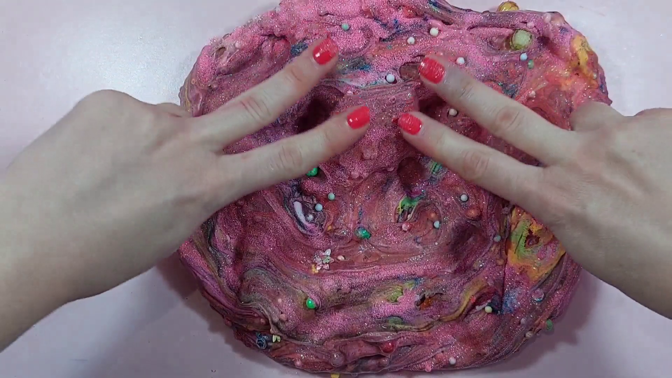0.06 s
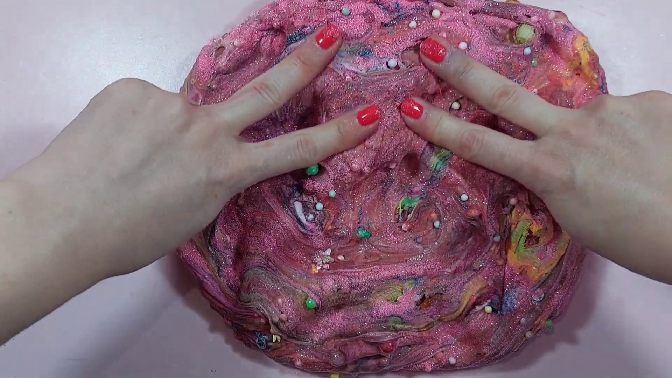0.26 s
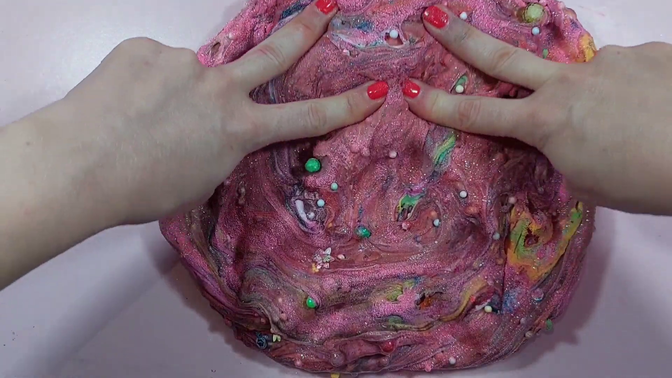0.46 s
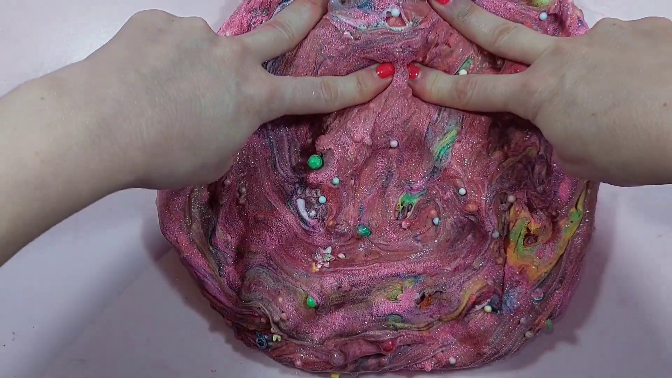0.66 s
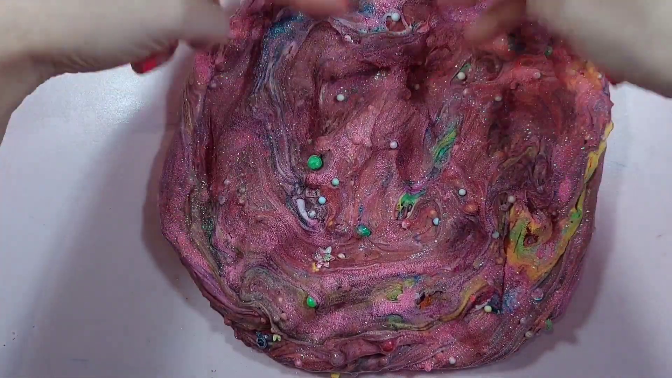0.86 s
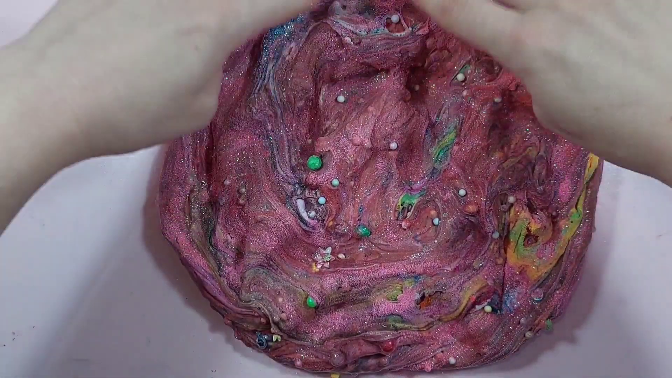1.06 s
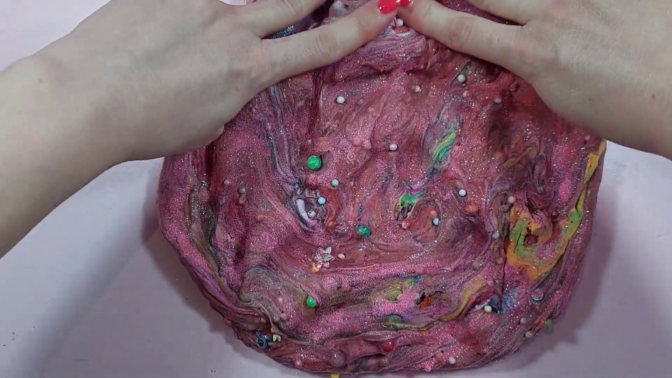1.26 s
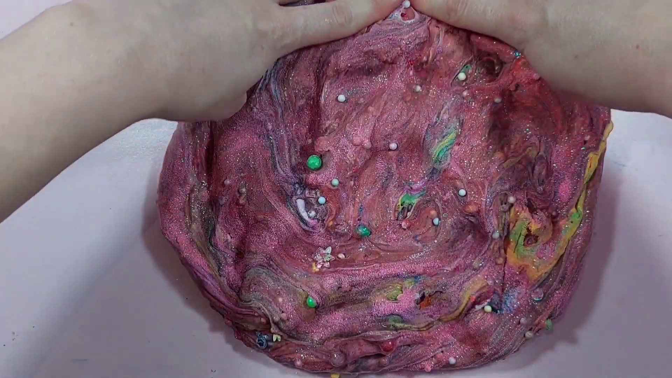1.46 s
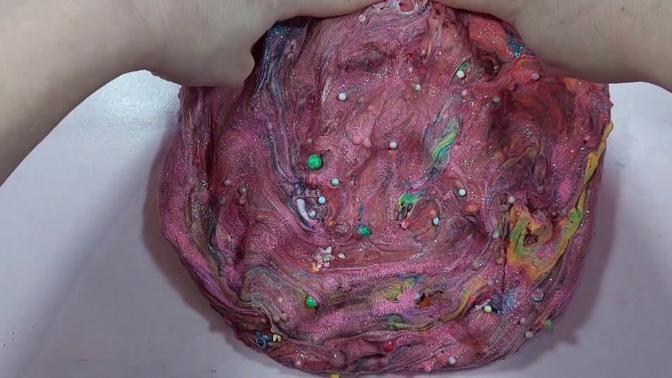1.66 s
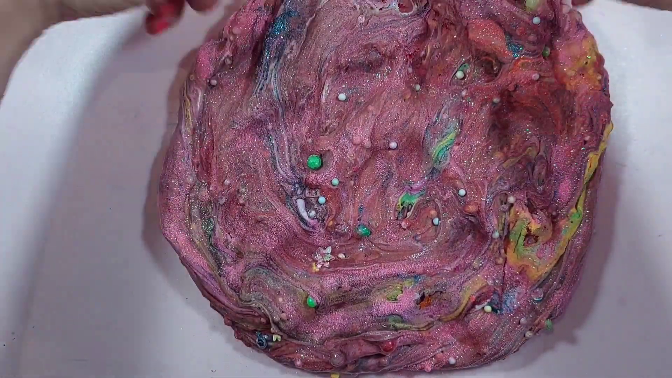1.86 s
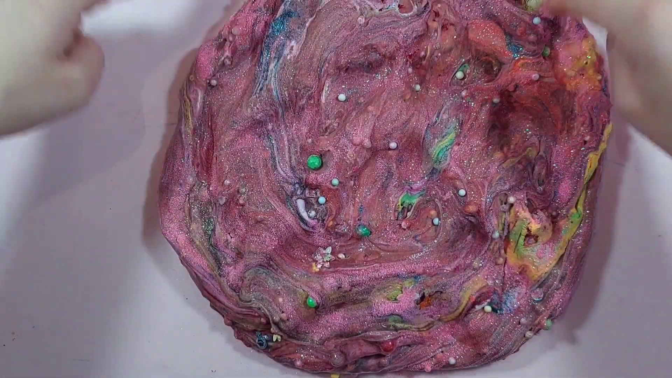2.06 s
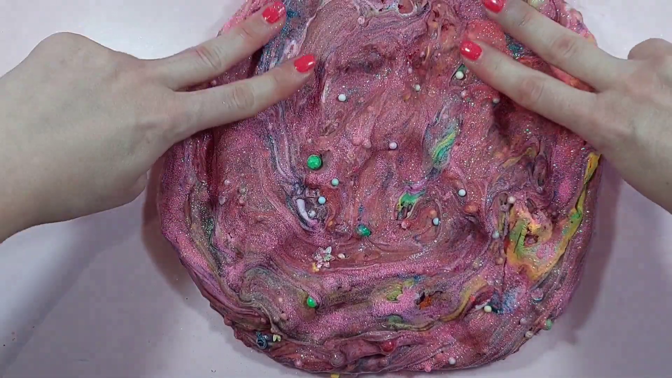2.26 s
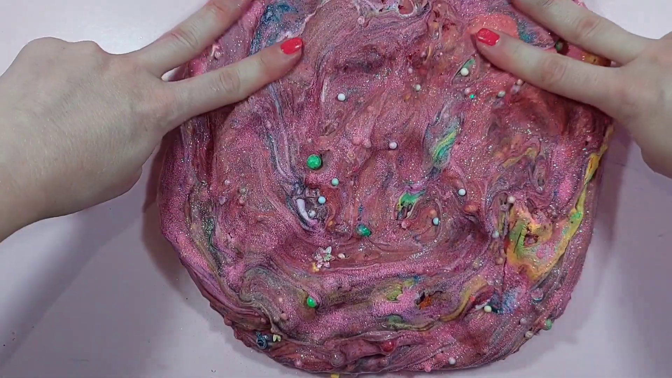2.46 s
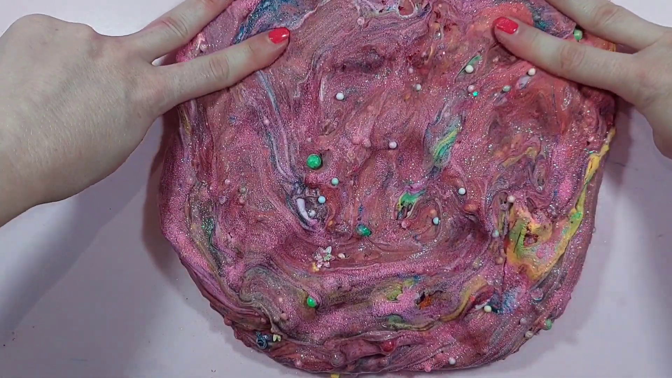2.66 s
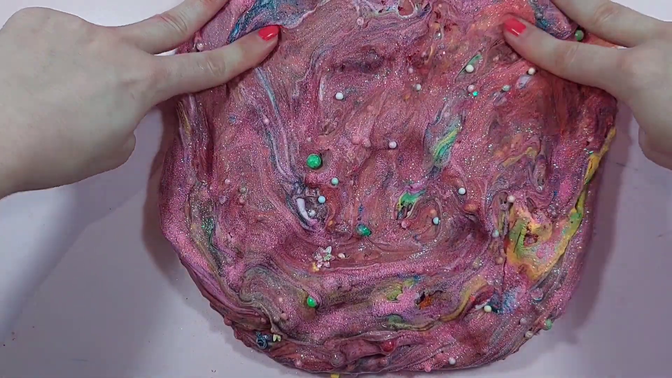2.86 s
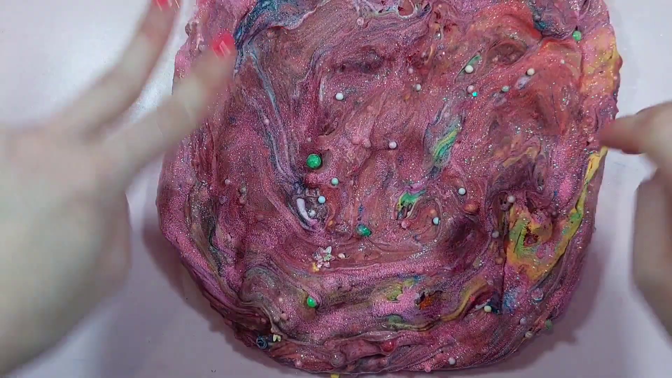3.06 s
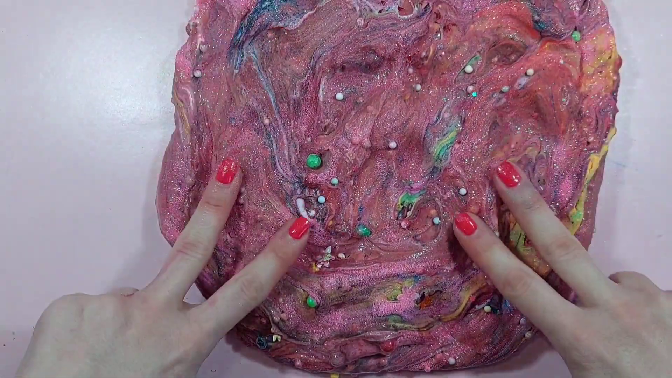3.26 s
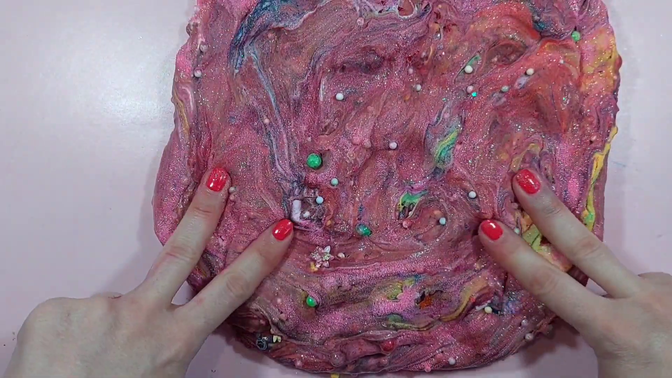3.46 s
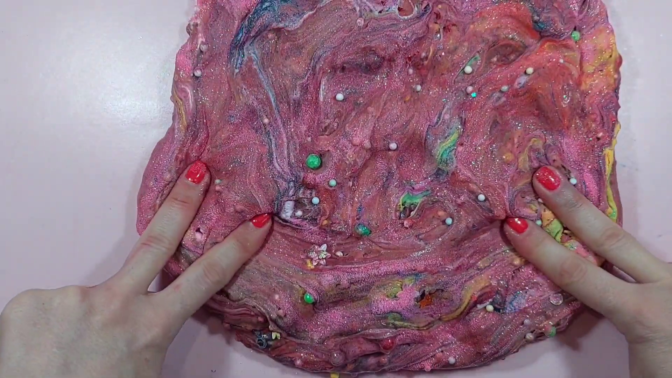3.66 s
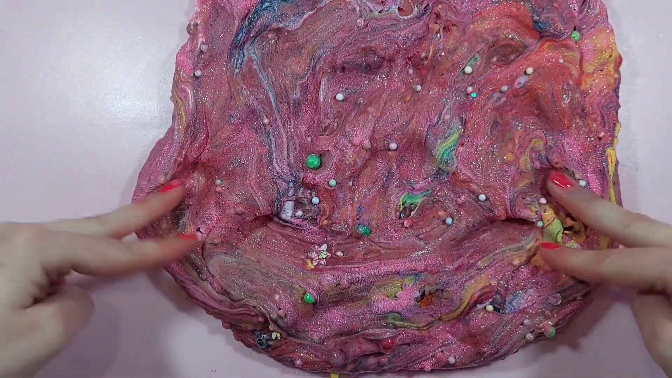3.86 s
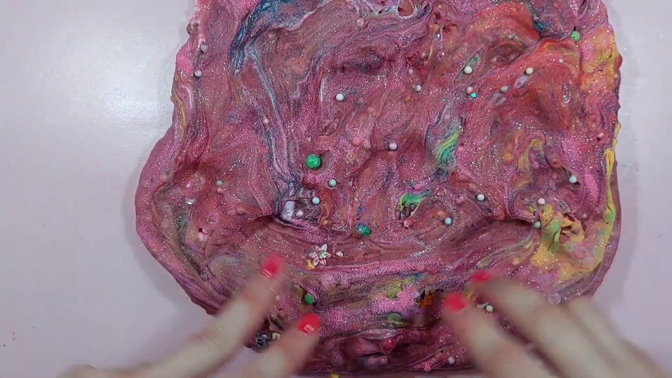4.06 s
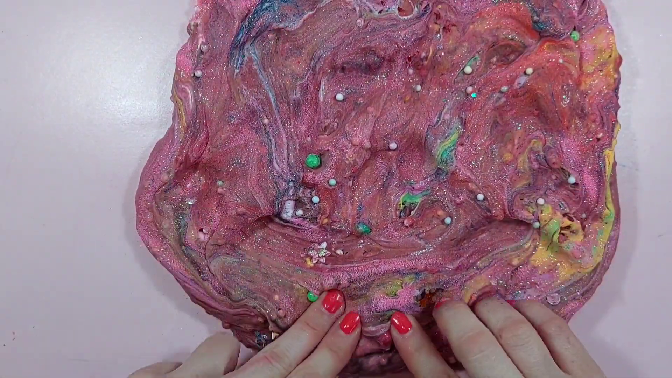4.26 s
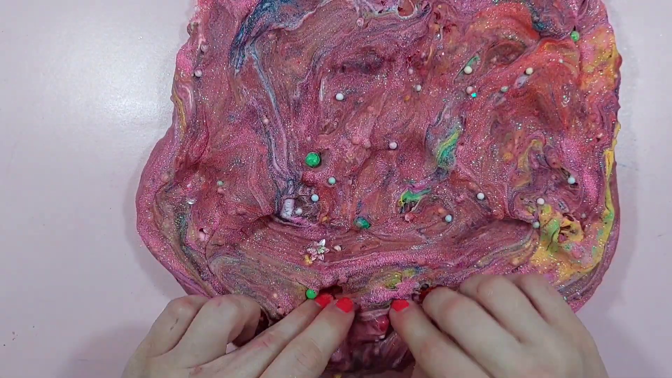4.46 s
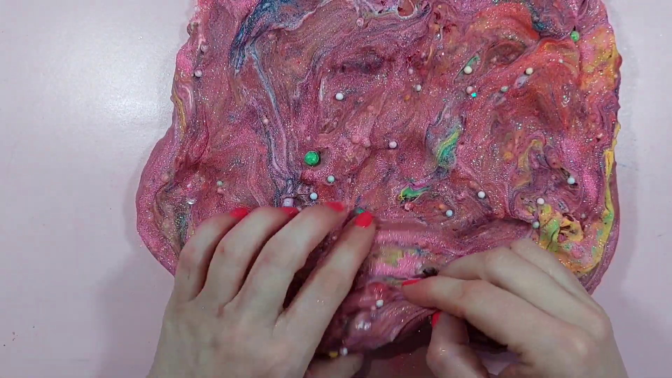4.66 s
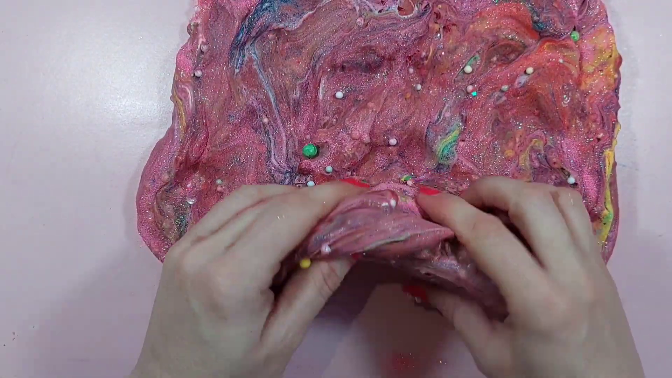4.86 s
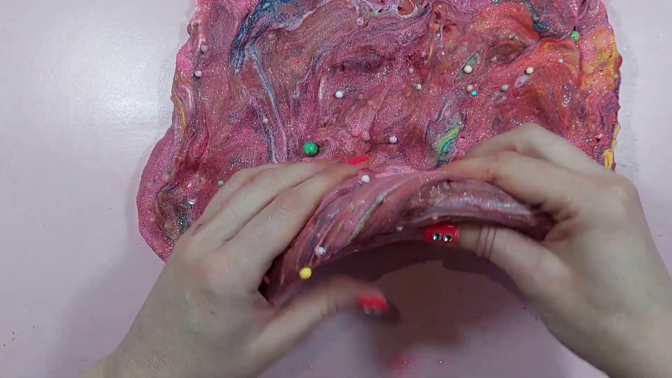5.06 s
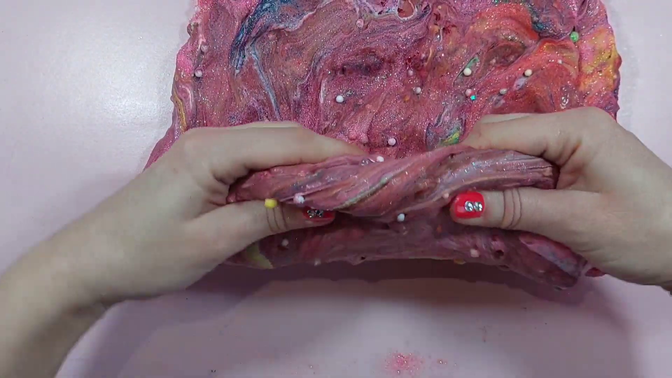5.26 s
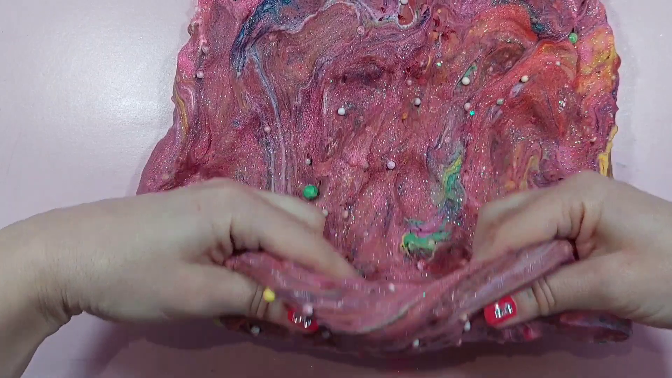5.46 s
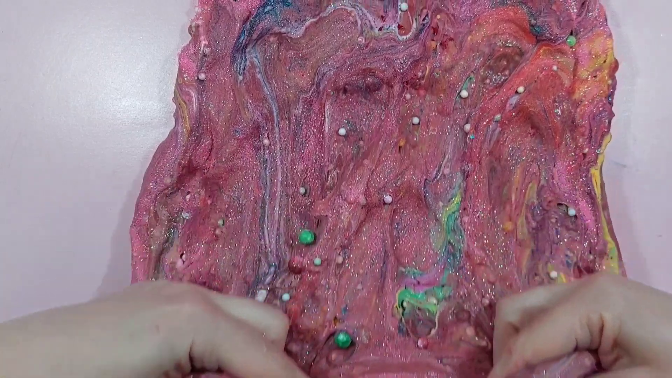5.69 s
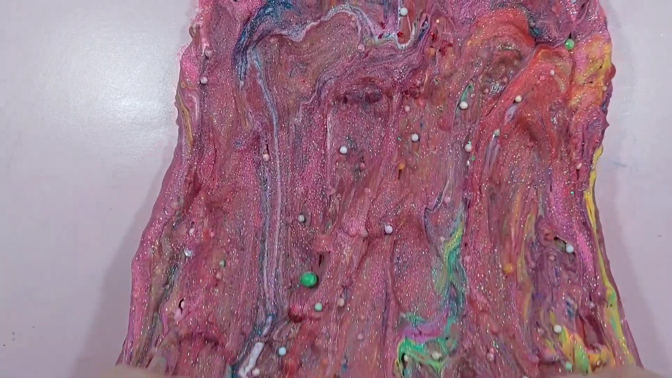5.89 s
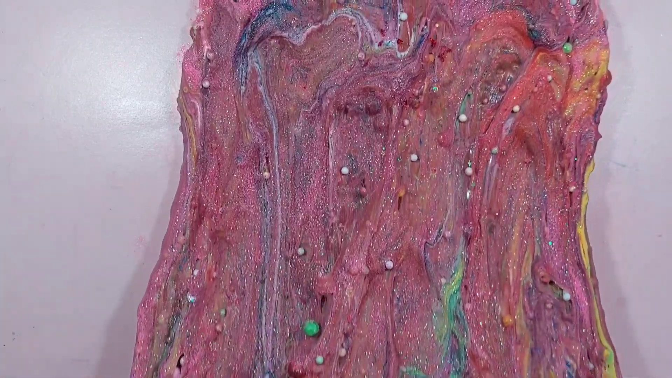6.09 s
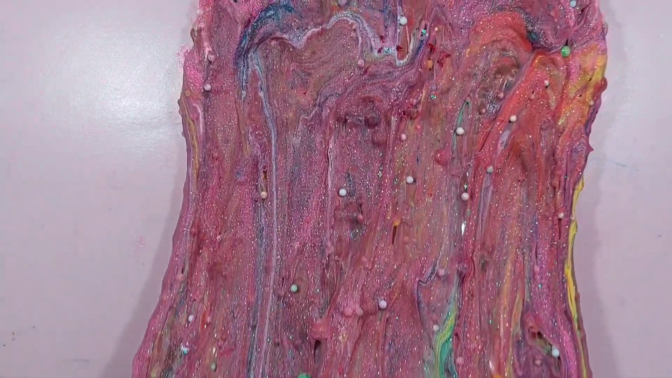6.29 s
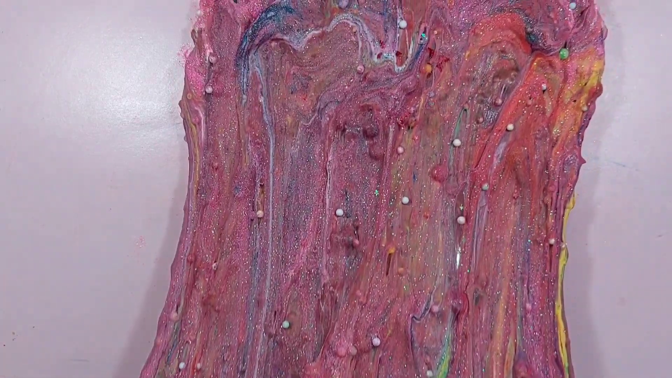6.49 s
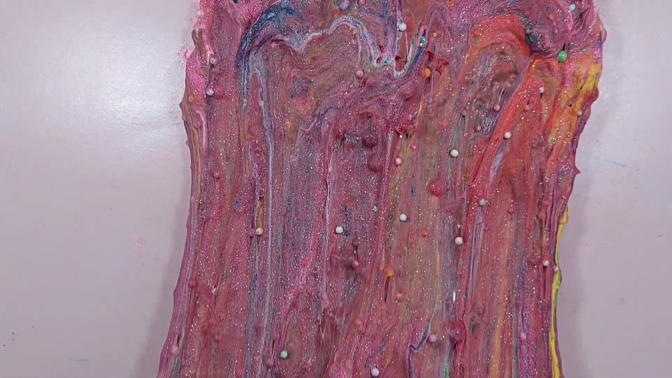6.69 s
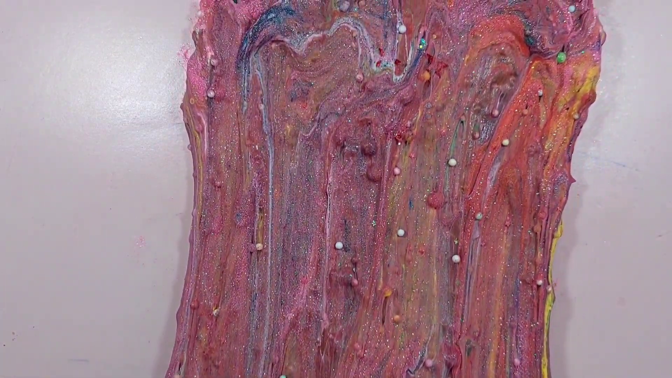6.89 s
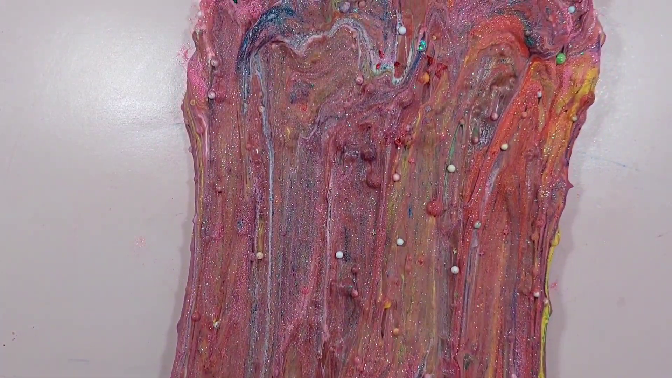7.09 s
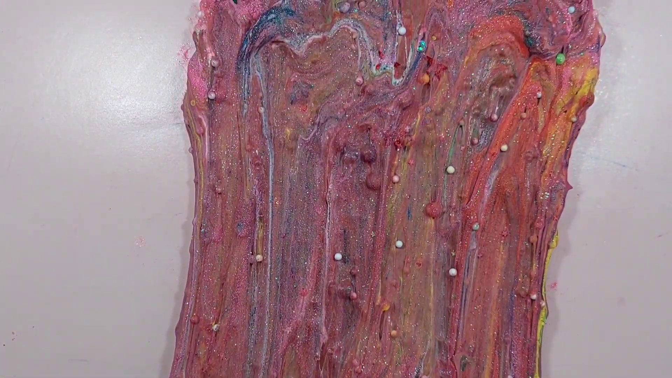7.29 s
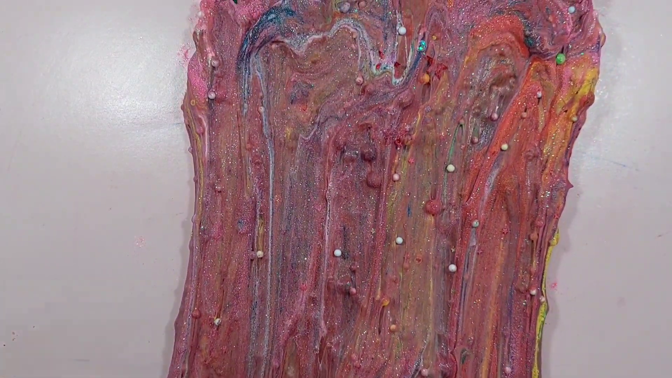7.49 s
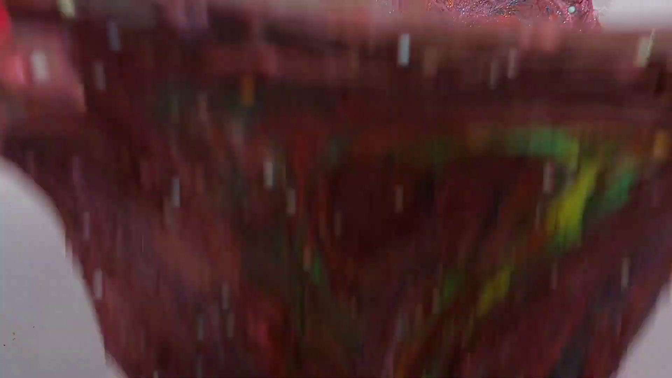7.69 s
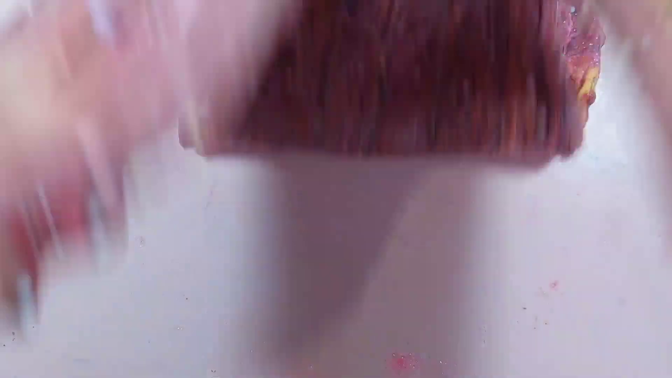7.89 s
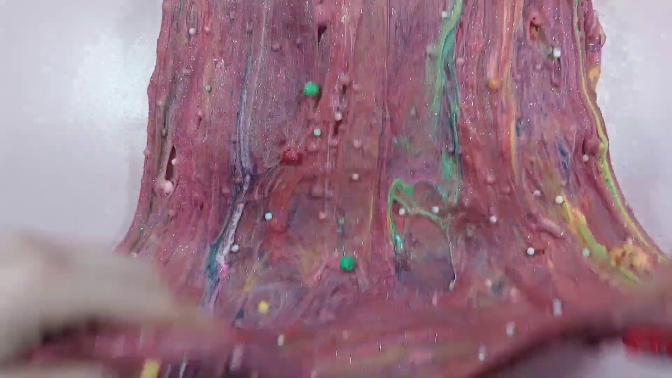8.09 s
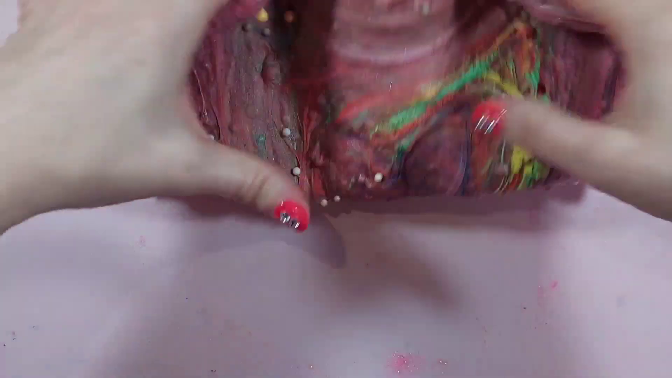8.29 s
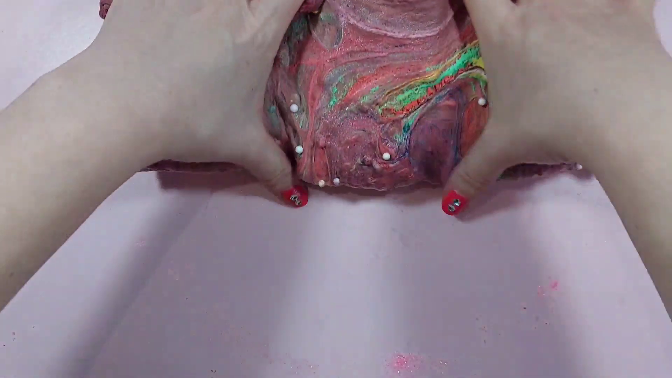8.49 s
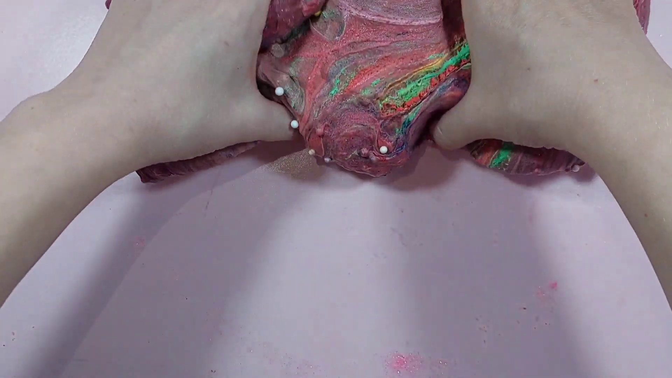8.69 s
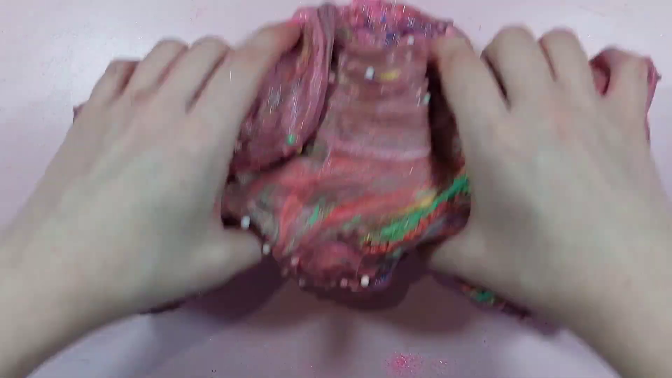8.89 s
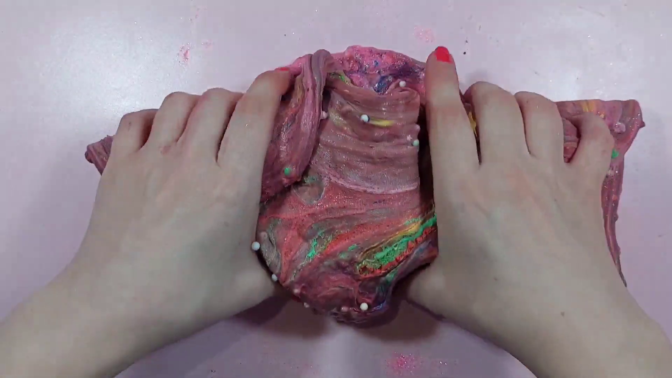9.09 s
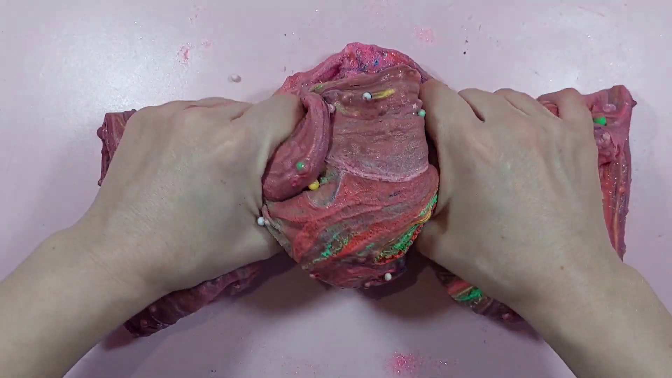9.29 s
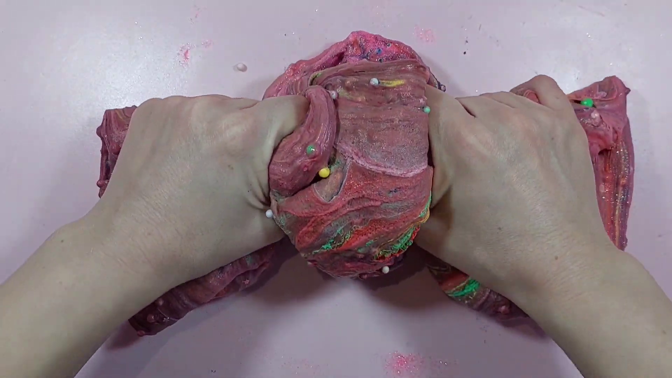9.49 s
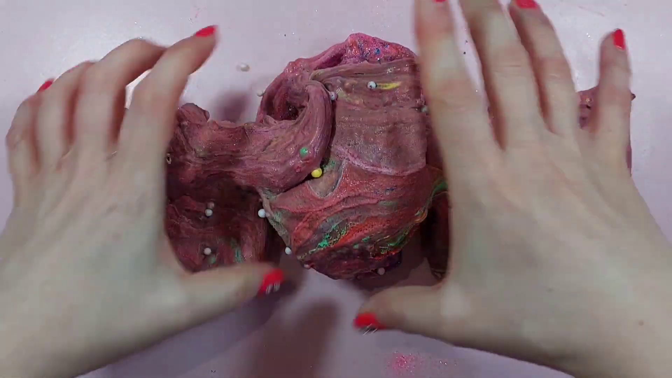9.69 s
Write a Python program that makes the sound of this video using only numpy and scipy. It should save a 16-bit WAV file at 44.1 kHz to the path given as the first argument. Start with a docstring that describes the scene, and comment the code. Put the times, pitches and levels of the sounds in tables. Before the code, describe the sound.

Hands poke, stretch and fold thick beaded slime on a table, with sticky crackles, small pops, then loud wet squelching and dull thumps.

```python
"""Poking and stretching beaded slime

Hands poke, stretch and fold thick beaded slime on a table under a spaced pair of microphones.
Air pockets pop as short noise bursts, and a small hard room rings after each one.
Sticky skin peels off fingers and table: a dense crackle of tiny tears with wet squelches in it.
The table top thumps in low decaying tones and is kneaded in its upper modes.
Quiet, gently patchy noise lies under everything."""
import sys
import numpy as np
from scipy import signal
from scipy.fft import rfft, irfft, next_fast_len
from scipy.io import wavfile
from scipy.ndimage import uniform_filter1d

SR = 44100
rng = np.random.default_rng(int(sys.argv[2]) if len(sys.argv) > 2 else 0)


def dump(signal):
    """Clip the signal to [-1, 1] and save it as 16-bit WAV at the path in sys.argv[1]."""
    limited = np.clip(np.atleast_2d(signal).T, -1, 1)
    pcm = np.round(limited * 32767).astype(np.int16)
    wavfile.write(sys.argv[1], SR, pcm)


N = 429534  # length in samples


def amp(db):
    """Turns decibels into a gain."""
    return 10 ** (np.asarray(db) / 20)


def evened(x):
    """Scales a sound to an average strength (rms) of 1."""
    return x / np.sqrt(np.mean(x ** 2) + 1e-20)


def read(points, hz):
    """Reads a curve of (Hz, value) points, with straight lines on a log-frequency axis."""
    point_hz, value = np.transpose(points)
    return np.interp(np.log(hz + 1), np.log(point_hz + 1), value)


def add(mix, s, sound):
    """Mixes a two-channel sound in at time s, cut off at the end of the mix."""
    part = mix[:, round(s * SR):][:, :sound.shape[1]]
    part += sound[:, :part.shape[1]]


def band(x, lo_hz, hi_hz):
    """Keeps the frequencies between two edges, without ringing ahead of the sound."""
    edges = np.clip([lo_hz, hi_hz], 20, .45 * SR)
    return signal.sosfilt(signal.butter(3, edges, "band", fs=SR, output="sos"), x)


def sides(pan_db):
    """Gains of the left and right microphones; a positive pan is louder on the left."""
    return amp(np.array([pan_db / 2, -pan_db / 2]))


def pop(s, db, hz, octaves, snap_db, pan_db):
    """A burst and its close echoes crowd the first milliseconds; the room answers evenly on both sides."""
    pocket_t60, snap_t60 = 0.27, 0.047  # s, room decay by 60 dB for the pocket tone and for the treble
    room_db = -21  # the room's answer below the peak of the burst
    t = np.arange(round(.22 * SR)) / SR
    echo_noise, room_noise = rng.standard_normal((2, 2, len(t)))
    uneven = amp(6.8 * rng.standard_normal((2, len(t))))
    echoes = echo_noise * uneven * amp(-60 * t / 0.027)
    echoes[:, 0] += 7  # the burst itself
    echoes[1] += 0.11 * echoes[0]  # a little of the left is heard on the right
    half = 2 ** (max(octaves, .2) / 2)
    pocket = (hz / half, hz * half, 0, pocket_t60)
    snap = (6000, 17000, snap_db, snap_t60)
    out = 0
    for lo, hi, part_db, t60 in (pocket, snap):
        direct = band(echoes, lo, hi)
        direct = direct / abs(direct).max(1)[:, None] * sides(pan_db)[:, None]
        tail = evened(band(band(room_noise, lo, hi), lo, hi))
        tail = tail * amp(room_db - 60 * t / t60) * (1 - np.exp(-t / 0.0003))
        out = out + amp(db + part_db) * (direct + tail)
    return s, out


def peel():
    """The tearing skin: a fine crackle on top, wet folds ringing around each stroke's pitch below."""
    # colour of the fine crackle: (pitch_hz, relative level_db per Hz)
    crackle_colour = [(600, -18), (1470, -8), (2500, -17.5), (3490, -9.5), (5000, -6), (8140, -4),
                      (12300, 0.5), (16000, -2)]
    wet_steep = 1.455  # dB of squelch for each dB of crackle
    rest_db = -77  # crackle of the lump creeping between strokes
    tears = grit(3000, 2.44, 0.013, 0.92)
    hz, t, z = signal.stft(tears, SR, nperseg=256, noverlap=192)

    (fine_db, wet_db, wet_hz, _), shape = strokes(t, 1)
    fine_level = np.sqrt(amp(fine_db) ** 2 @ shape + amp(rest_db) ** 2)
    fine = amp(read(crackle_colour, hz))[:, None] * fine_level

    octaves = np.log2((hz[:, None] + 1) / wet_hz)
    below = .8  # octaves; steep below the pitch
    above = 1.47 * (wet_hz / 3500) ** 0.42  # octaves; deep folds ring more narrowly
    folds = np.exp(-2 * (octaves / np.where(octaves < 0, below, above)) ** 2)
    wet_power = folds / folds.mean(0) * amp(wet_db) ** 2
    wet = np.sqrt(wet_power @ strokes(t, wet_steep)[1])

    # small cavities open and close: short-lived narrow patches of colour
    cavities = rng.standard_normal((len(t), len(hz))).T
    cavities = uniform_filter1d(cavities, size=20, axis=1)
    cavities = evened(uniform_filter1d(cavities, size=2, axis=0))
    z = z * np.hypot(fine, wet * amp(3.45 * cavities))
    return signal.istft(z, SR, nperseg=256, noverlap=192)[1][:, :N]


def strokes(t, steep):
    """Settings of all strokes and pulls as columns, and each one's rise, hold and fall as power at times t."""
    # presses, folds and squeezes; rise and fall are the times for 20 dB at a steepness of 1:
    # (peak_s, rise_s, hold_s, fall_s, fine crackle gain_db, wet squelch gain_db, squelch pitch_hz,
    # load on the table level_db)
    presses = [(0.29, 0.14, .01, 0.49, -52.5, -57.5, 2650, -68),
               (0.45, 0.32, 0.093, 0.14, -49, -54, 2960, -66.5),
               (0.578, 0.02, 0.028, 0.13, -49.5, -55, 1180, -60.5),
               (1.207, .1, 0.1, 0.33, -62, -87, 3000, -70), (1.443, 0.12, .16, 0.17, -45.5, -64, 2850, -59),
               (2.05, .4, 0.085, 0.25, -65, -87, 3000, -67.5),
               (2.328, 0.055, 0.17, 1, -50.5, -87, 3970, -91),
               (2.552, 0.24, 0.018, 0.17, -63, -55.5, 3050, -70),
               (2.654, 0.02, 0.009, 0.18, -57, -40, 3240, -57.5),
               (3.428, .08, 0.21, 0.26, -52.5, -76, 3530, -76),
               (4.225, .01, 0.009, 0.39, -68, -65.5, 3000, -68),
               (4.29, 0.023, 0.034, 0.13, -44, -60.5, 1000, -53.5),
               (4.436, 0.22, 0.022, 0.78, -44.5, -57, 3220, -69),
               (4.619, 0.095, .025, 0.071, -40, -44.5, 3400, -59),
               (4.708, 0.092, 0.065, 0.34, -42.5, -54, 2100, -62.5),
               (4.955, 0.11, .01, 0.15, -45, -53, 2570, -60.5),
               (5.149, 0.059, 0.074, 1, -47.5, -56.5, 2120, -65),
               (5.288, 0.041, 0.0082, 0.17, -43, -51.5, 2800, -70),
               (5.456, 0.26, .05, 0.25, -48.5, -68, 2200, -78),
               (5.571, .01, .02, 0.11, -49, -54, 1800, -66),
               (5.688, 0.27, 0.025, 0.23, -46.5, -61.5, 2200, -69),
               (6.204, .01, 0.0082, 0.19, -53, -59.5, 2440, -89),
               (6.212, 0.9, 0.24, .4, -56.5, -93, 2700, -94), (6.9, 0.96, 0.079, .3, -62, -77, 2000, -72.5),
               (7.14, 0.11, 0.059, 0.17, -46.5, -53, 2120, -66),
               (7.501, 0.018, 0.015, 0.13, -46.5, -42, 2650, -55),
               (7.675, 0.0042, 0.0062, 0.067, -38, -42, 3840, -76),
               (7.733, 0.048, 0.035, 0.19, -67, -47, 3900, -88),
               (7.909, 0.33, 0.013, .11, -40.5, -45, 2870, -56.5),
               (8.027, 0.0076, .005, 0.16, -38.5, -43, 2760, -47.5),
               (8.074, 0.056, 0.011, 0.063, -42, -49, 980, -53),
               (8.342, 0.074, 0.013, 0.056, -60, -47, 1010, -51),
               (8.214, 0.047, 0.043, .14, -38, -46, 2270, -55.5),
               (8.36, 0.0083, 0.0018, 0.037, -30.5, -46, 3200, -34.5),
               (8.406, 0.071, 0.016, 0.066, -36.5, -59, 3800, -44),
               (8.463, 0.0084, .01, 0.17, -37, -38, 3900, -54),
               (8.591, 0.077, 0.033, 0.45, -37.5, -36, 2070, -41.5),
               (8.65, .04, .01, .2, -50, -44, 1160, -42.5),
               (8.703, 0.036, .01, 0.19, -37, -32.5, 1620, -48),
               (8.77, 0.11, 0.036, 0.074, -26.5, -32, 2630, -36.5),
               (8.828, 0.025, 0.0071, 0.046, -46, -44.5, 1090, -43.5),
               (8.951, 0.017, .02, 0.081, -36, -56, 2500, -45.5),
               (8.982, 0.015, 0.0041, 0.12, -35, -40, 3270, -35),
               (9.099, 0.063, 0.1, 0.4, -46.5, -49, 2700, -56),
               (9.216, 0.021, 0.0044, 0.23, -37, -37, 2100, -36),
               (9.323, 0.16, 0.0054, 0.12, -33, -41, 1480, -43),
               (9.543, 0.026, 0.033, 0.21, -38, -43, 1920, -55),
               (9.601, 0.093, 0.013, 0.082, -28, -32, 1570, -35)]
    # fingers pulled out of the slime, all rising and falling alike:
    # (peak_s, fine crackle gain_db, wet squelch gain_db, squelch pitch_hz, load on the table level_db)
    pulls = [(0.794, -33, -44, 2840, -54.5), (1.804, -35, -50.5, 2930, -53.5),
             (2.863, -39.5, -53.5, 1940, -52), (3.848, -34, -54, 2500, -57.5)]
    pull_rise_s, pull_hold_s, pull_fall_s = 0.063, 0.028, 0.078
    pull_rows = [(s, pull_rise_s, pull_hold_s, pull_fall_s, *rest) for s, *rest in pulls]
    rows = np.array(list(presses) + pull_rows)
    s, rise, hold, fall = np.maximum(rows[:, :4], .001).T[:, :, None]
    away = np.maximum((s - t) / rise, (t - s - hold) / fall)
    below = np.maximum(away, 0)  # in steps of 20 dB; zero during the hold
    return rows[:, 4:].T, amp(-20 * steep * below) ** 2


def grit(per_s, spread_db, blur_t60, smooth):
    """Tiny tears at six spots, a few large, blurred by close echoes, over a smooth share of distant ones."""
    sizes = amp(spread_db * np.minimum(rng.exponential(1, N), 5))
    tears = sizes * rng.standard_normal(N)
    tears *= rng.random(N) < per_s / SR  # keep only the moments when something tears
    spot, t = rng.integers(0, 6, N), np.arange(2000) / SR
    blur = rng.standard_normal((6, 2, len(t))) * amp(-60 * t / blur_t60)
    near = 0
    for k in range(6):
        here = (tears * (spot == k))[None]
        near = near + signal.oaconvolve(here, blur[k], axes=1)[:, :N]
    return evened(evened(near) + smooth * rng.standard_normal((2, N)))


def slap():
    """The lump kneads the table top, whose upper modes sound almost alike in both microphones."""
    # upper modes of the table top: (pitch_hz, width_hz, relative level_db)
    board_modes = [(190, 155, 1), (310, 65, 1), (477, 310, -0.5), (616, 29, -6), (939, 82, -7)]
    load_steep = 1  # dB of load for each dB of crackle
    rest_db = -73  # load of the lump creeping between strokes
    t = np.arange(0, N / SR + .002, .002)
    (*_, load_db), shape = strokes(t, load_steep)
    load = np.sqrt(amp(load_db) ** 2 @ shape + amp(rest_db) ** 2)

    push = grit(300, 0.9, 0.069, 0.54)
    push[1] = evened(push[0] + .6 * push[1])  # the right shares most of the left
    size = next_fast_len(N, True)
    hz = np.fft.rfftfreq(size, 1 / SR)
    response = 0
    for f, width, db in board_modes:
        response = response + amp(db) / (1 + 1j * (hz / f - f / (hz + 1)) * f / width)
    board = evened(irfft(rfft(push, size) * response, size)[:, :N])
    return board * np.interp(np.arange(N) / SR, t, load)


def thump(s, db, hz, t60):
    """The table top swings unevenly in its lowest mode, with a duller one below, felt more on the right."""
    t = np.arange(round(.6 * SR)) / SR
    shape = (1 - np.exp(-(t / 0.0077) ** 2)) * amp(-60 * t / t60)
    main = np.sin(2 * np.pi * (hz * t + rng.random()))
    dull = 0.13 * np.sin(2 * np.pi * (0.614 * hz * t + rng.random()))
    shudder = evened(band(rng.standard_normal((2, len(t))), 28.5, 176))
    swing = shape / shape.max() * (main + dull + 0.3 * shudder)
    return s, amp(db) * band(swing, 43, 980) * sides(-4.5)[:, None]


def room_noise():
    """Room rumble and microphone hiss: noise shaped in frequency, gently patchy."""
    # colour of the background: (pitch_hz, relative level_db per Hz)
    noise_colour = [(12, -65), (20, -29), (53, -5), (120, 2.5), (150, -10.5), (319, -10), (499, -18),
                    (660, -21), (718, -25), (2260, -27.5), (4060, -36.5), (7310, -36), (11400, -43),
                    (12400, -29), (16000, -38)]
    # left-right likeness, 1 alike and -1 opposite: (pitch_hz, likeness without unit)
    likeness = [(60, 0.34), (180, 0.15), (550, -0.37), (1650, -0.41), (4970, -0.5), (15000, 0.17)]
    frames, hz = N // 512 + 5, np.fft.rfftfreq(2048, 1 / SR)
    a, b, c, d, patches = rng.standard_normal((frames, 1025, 5)).T
    patches = evened(uniform_filter1d(uniform_filter1d(patches, 16, 0), 8, 1))
    same = np.clip(read(likeness, hz), -1, 1)[:, None]
    left, other = a + 1j * b, c + 1j * d
    z = np.array([left, same * left + np.sqrt(1 - same ** 2) * other])
    z *= amp(read(noise_colour, hz)[:, None] + 1.3 * patches)
    noise = signal.istft(z, nperseg=2048, noverlap=1536)[1][:, :N]
    return amp(-61) * evened(noise)


def scene():
    """Pops and peeling, coloured by close echoes, over the table's sounds and the background noise."""
    # bursting air pockets, levels ahead of the close-echo colour:
    # (start_s, peak level_db, pocket pitch_hz, width_octaves, snap_db above the pocket, left-right pan_db)
    pockets = [(0.244, -45.5, 1280, 1, -4, 0), (0.273, -42.5, 1750, 1.8, -1, 3),
               (0.294, -33.5, 2820, 0.78, -11, 2), (0.395, -36.5, 7910, 4, 2, -3),
               (0.423, -24, 3040, 1.3, -8, -2), (0.452, -20, 3300, 1.8, -24, 8),
               (0.523, -35.5, 3130, .62, -13, 0), (0.537, -36, 3250, 0.67, -13, -1),
               (0.564, -48, 1130, .51, -5, 8), (0.592, -42, 1210, 0.41, -14, 14),
               (1.436, -56, 2000, 1.7, 20, 2), (2.517, -44, 6300, .77, 6, 0),
               (2.541, -32.5, 2980, 1, -16, 0), (2.566, -41, 3700, 0.61, -13, -2),
               (2.654, -19, 3400, 0.51, -5, 0), (3.42, -52, 5000, 2.5, 1, 0), (3.56, -47, 8700, 2, 10, 2),
               (3.599, -30, 8700, 1.16, -13, 4), (4.218, -48.5, 2410, 2.6, -30, 1),
               (4.29, -40, 930, 4.2, 2, 9), (4.7, -45, 5060, 1.1, 14, -8),
               (4.958, -39, 4900, 1.3, -7, -0.5), (5.141, -45.5, 2130, 1, 2, 12),
               (5.238, -41, 1700, 0.77, -12, 3), (5.285, -29, 7860, 1.9, 5, -4),
               (5.437, -44.5, 7360, 4.5, 14, 1), (5.481, -49, 1920, 0.82, 12.5, 0),
               (5.572, -45, 1670, 1.9, 5, 5), (6.204, -41, 2520, 0.55, 6, 3), (6.44, -58, 1600, 1.1, -3, 2),
               (6.662, -51, 7800, 1.9, 2, 1), (7.495, -26, 2830, 3.2, -2, 2),
               (7.675, -23, 4470, 2.6, -23, 4), (7.732, -33, 5130, 1.6, 8, -6),
               (7.742, -21.5, 4700, 1.5, -1.5, 9), (7.757, -27, 4200, 3.3, -8, -4),
               (7.781, -30.5, 4970, 1.27, -4, 14), (7.809, -32, 3650, 1.6, 5.5, 2),
               (7.834, -36, 3850, 0.81, -5, -1), (7.861, -27.5, 3070, 1.06, 2, 3),
               (7.896, -26.5, 6400, 1.4, 2, 7), (8.025, -25, 3820, 1.56, 3.5, 8),
               (8.04, -43, 6000, 1.7, -3, 2), (8.082, -34.5, 2860, 0.55, -2, 4),
               (8.21, -32.5, 5450, .98, 7.5, 0), (8.358, -12, 3700, 3.5, -10, 1),
               (8.413, -14, 4040, 1.6, 3, 1), (8.465, -16.5, 4150, 0.82, -1.5, 2),
               (8.55, -34, 1190, 1.7, -5, 0), (8.583, -30, 2550, 1.9, -10, 0),
               (8.636, -20.5, 1110, 0.63, -4, 3), (8.7, -14, 1130, 0.56, -27, 5),
               (8.706, -19, 1490, 1.56, -15, -4), (8.763, -27, 1090, 0.49, -15, 7),
               (8.807, -19, 1020, 0.56, 1, 1), (8.977, -18.5, 3550, 2.9, -22, 2),
               (9.107, -24, 3180, 2.2, -13, -6), (9.22, -17.5, 1990, 1.63, -22, 4),
               (9.288, -26.5, 2050, 1.8, -13, 0), (9.317, -22.5, 1360, 1.33, 0, 4),
               (9.599, -26, 1730, 0.39, 10, -2)]
    # pushes on the table top: (start_s, gain_db, pitch_hz, 60 dB decay_s)
    pushes = [(0.468, -55, 125, 0.2), (1.491, -43, 100, 0.095), (1.79, -53.5, 134, 0.25),
              (2.542, -47.5, 112, 0.31), (2.648, -46, 99, 0.43), (2.914, -47, 103, 0.53),
              (3.84, -53, 110.2, 0.36), (4.228, -45.5, 103, 0.17), (4.325, -42, 112.5, 0.23),
              (4.734, -49.5, 86.1, 0.11), (7.494, -39.5, 97, 0.13), (7.915, -44, 115.6, 0.25),
              (8.048, -52, 107.4, 0.54), (8.356, -37.5, 110, 0.29), (8.59, -44.5, 116.3, 0.72),
              (8.783, -37, 114, 0.16), (8.983, -30.5, 102.6, 0.2), (9.109, -34.5, 89.5, 0.19),
              (9.219, -27, 107.6, 0.16), (9.598, -27.5, 108.4, 0.21)]
    # echoes from the table and the lump colour every close sound: (pitch_hz, gain_db)
    nearby = [(400, -1), (760, -0.5), (980, 4.5), (1250, -3), (1650, 3), (3000, -1.1), (5100, 2.5),
              (6000, 0), (12000, -1.7)]
    slime, table = peel() * sides(0.46)[:, None], slap()
    for row in pockets:
        add(slime, *pop(*row))
    for row in pushes:
        add(table, *thump(*row))
    colour = amp(read(nearby, np.linspace(0, SR / 2, 513)))
    # squared, because the minimum-phase step takes the square root
    squared = signal.firwin2(1023, np.linspace(0, 1, 513), colour ** 2)
    taps = signal.minimum_phase(squared)
    coloured = signal.oaconvolve(slime, taps[None], axes=1)[:, :N]
    return coloured + table + room_noise()


def record(dry):
    """Removes the treble above the band limit with a steep low-pass filter."""
    edge_hz = 15900
    low_pass = signal.firwin(511, edge_hz, window=("kaiser", 9), fs=SR)
    return signal.oaconvolve(dry, low_pass[None], "same")


dry = scene()
out = record(dry)
dump(out)
```